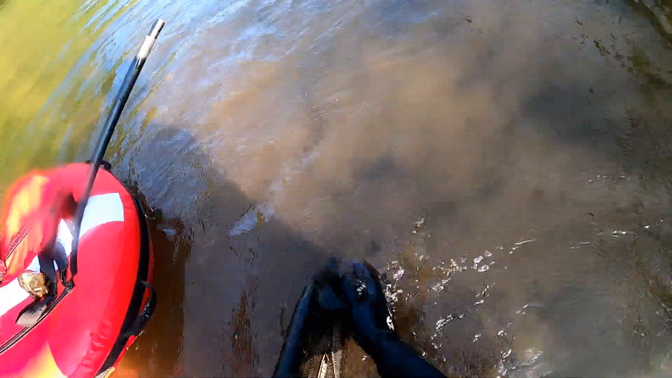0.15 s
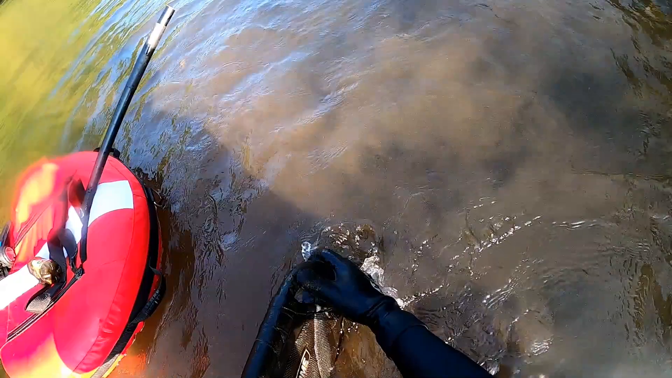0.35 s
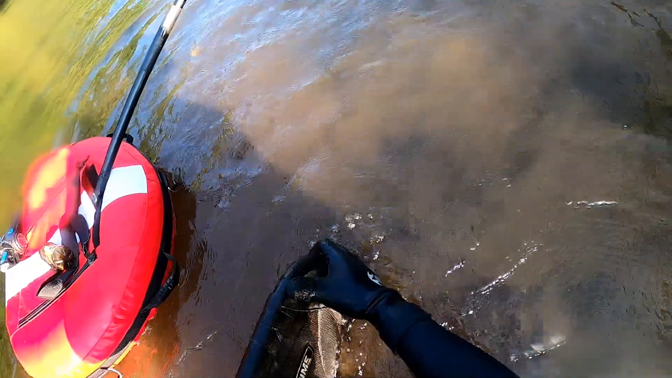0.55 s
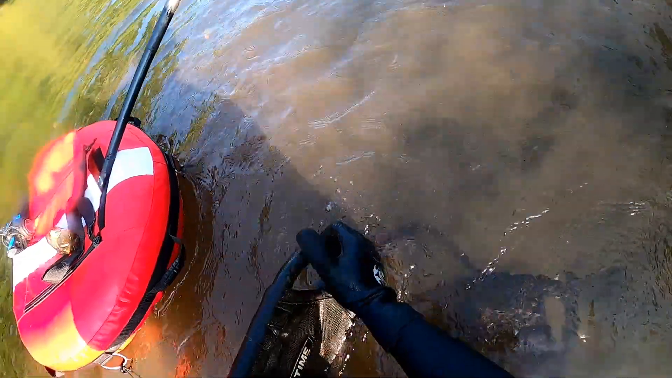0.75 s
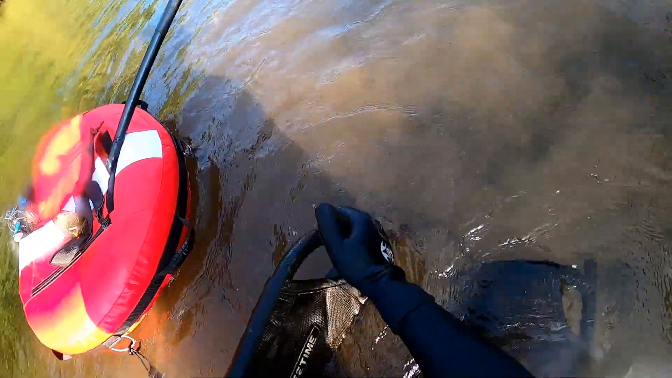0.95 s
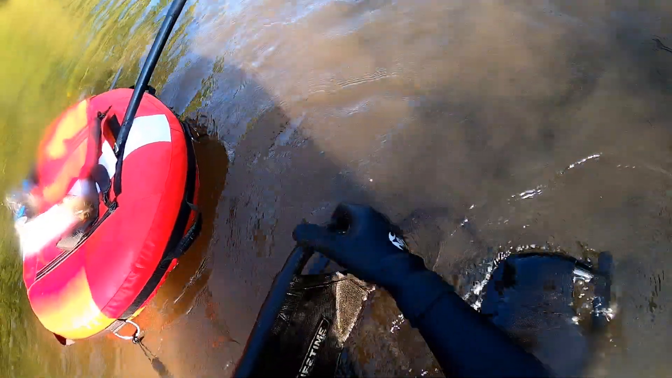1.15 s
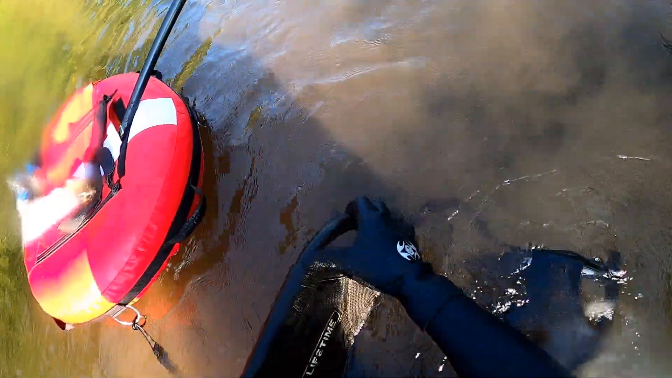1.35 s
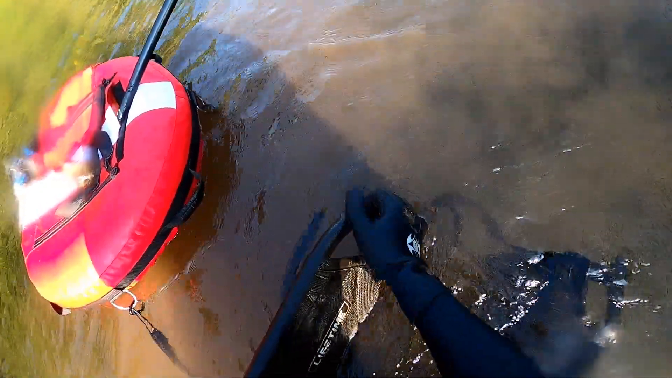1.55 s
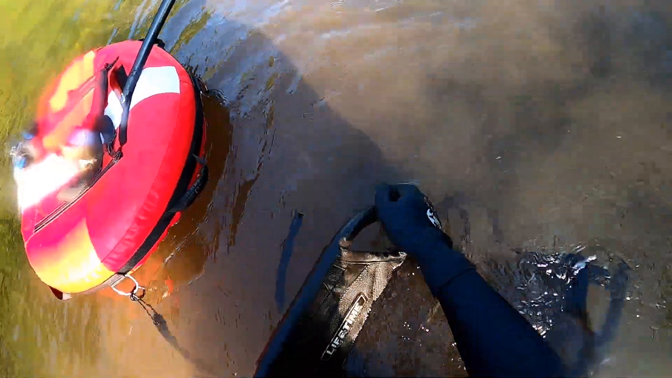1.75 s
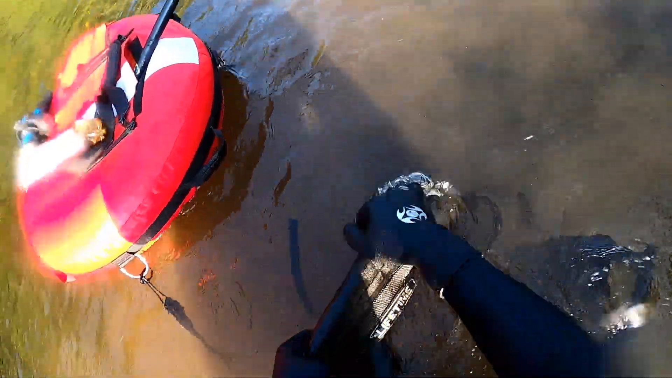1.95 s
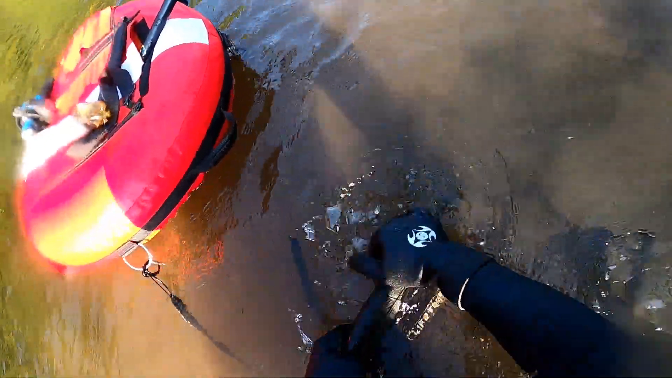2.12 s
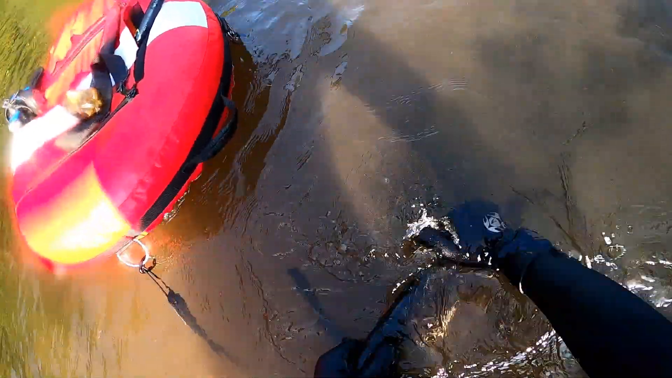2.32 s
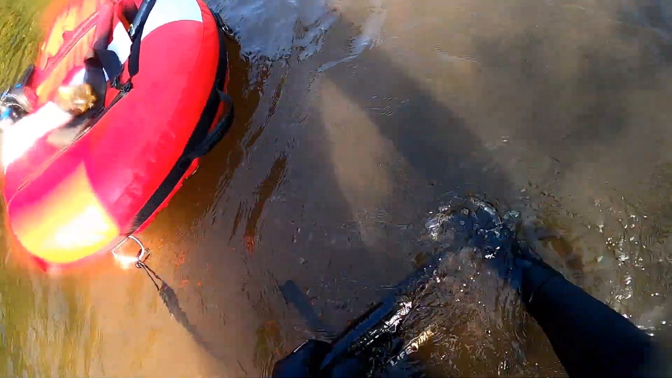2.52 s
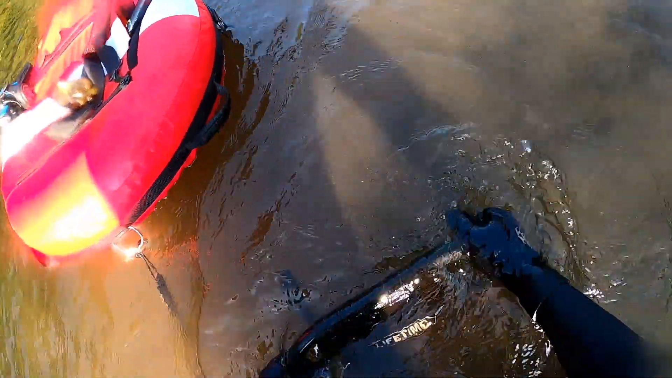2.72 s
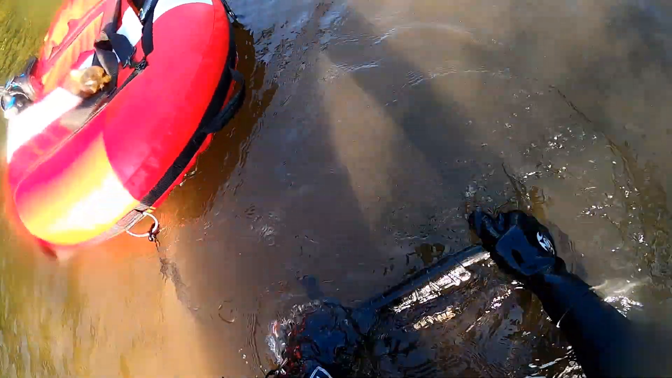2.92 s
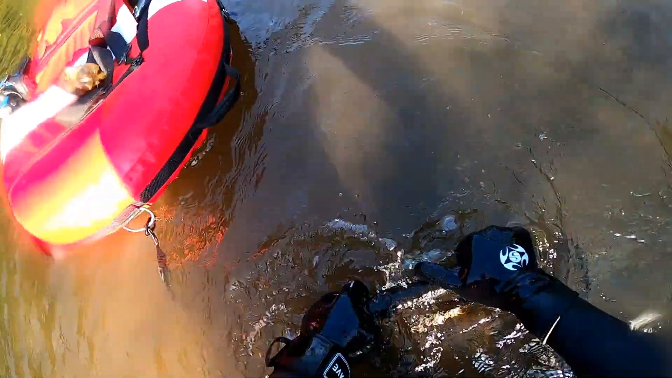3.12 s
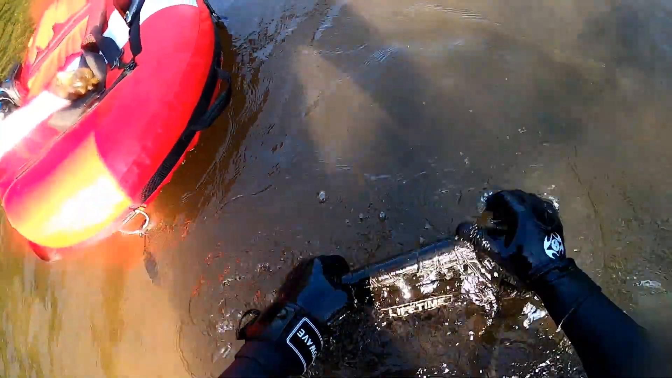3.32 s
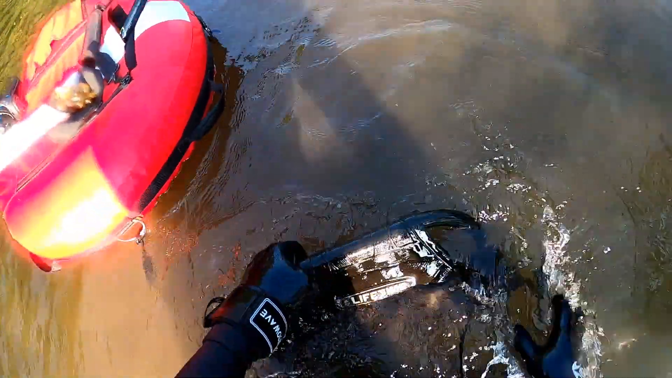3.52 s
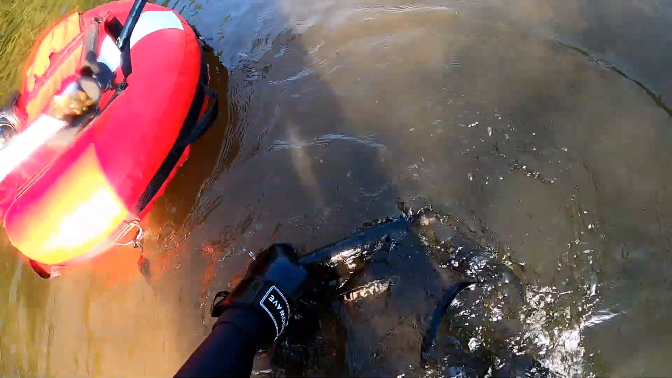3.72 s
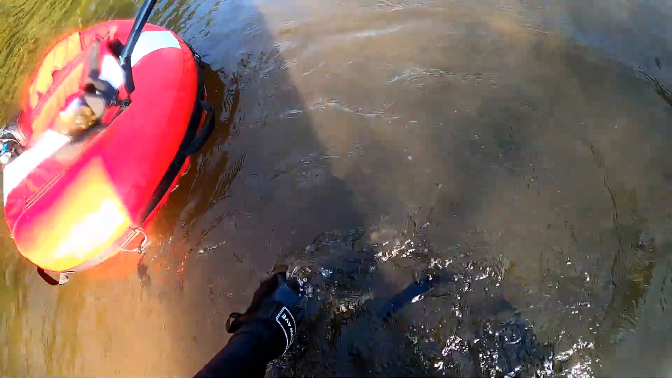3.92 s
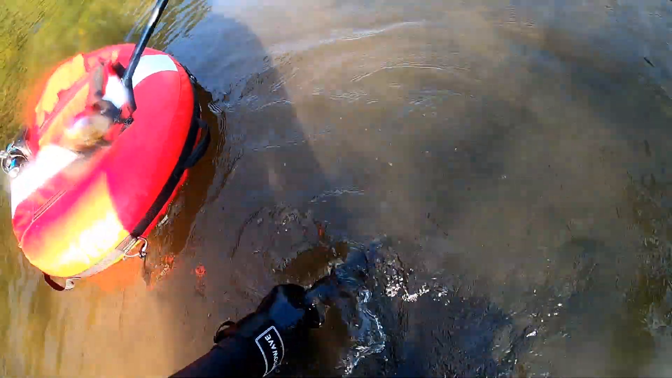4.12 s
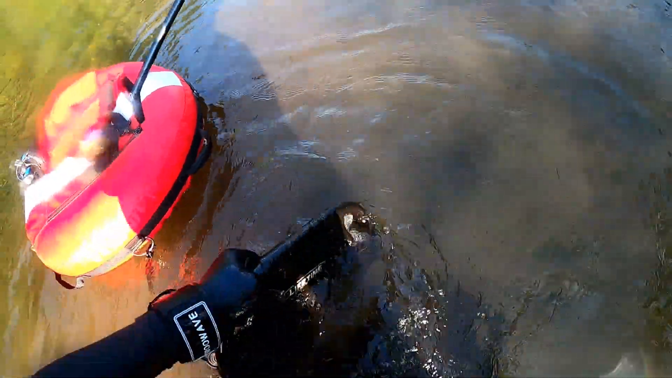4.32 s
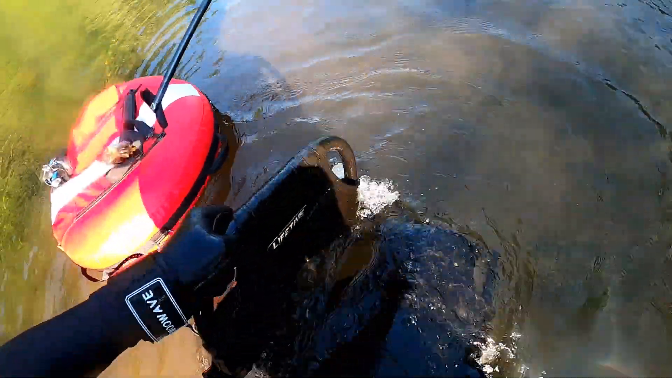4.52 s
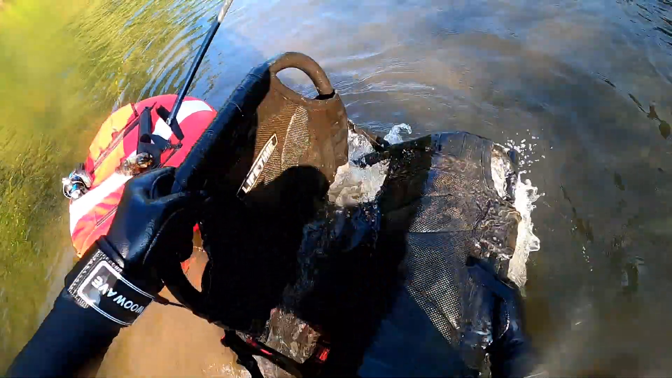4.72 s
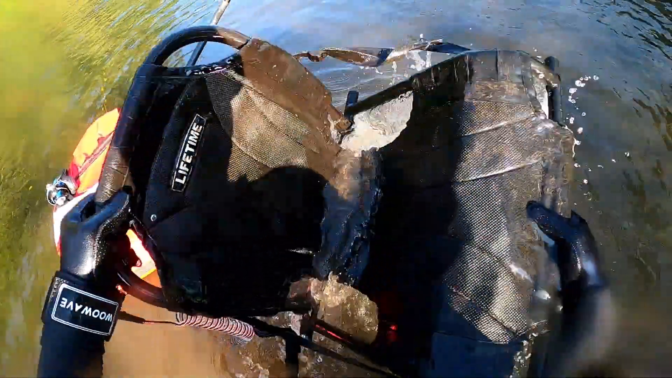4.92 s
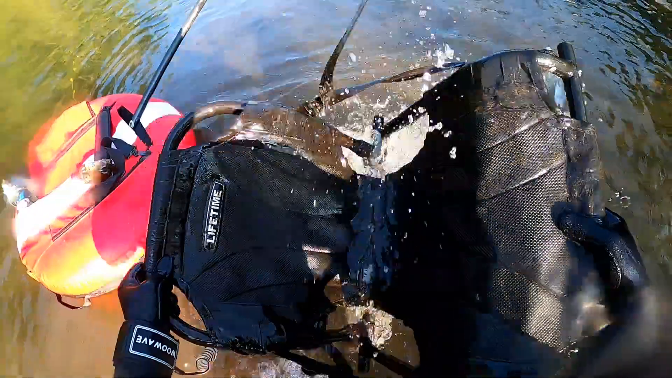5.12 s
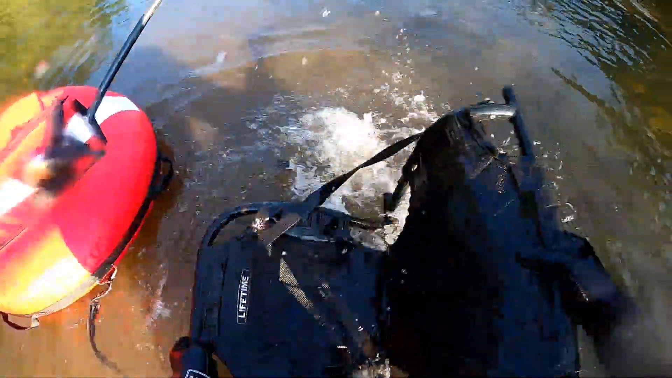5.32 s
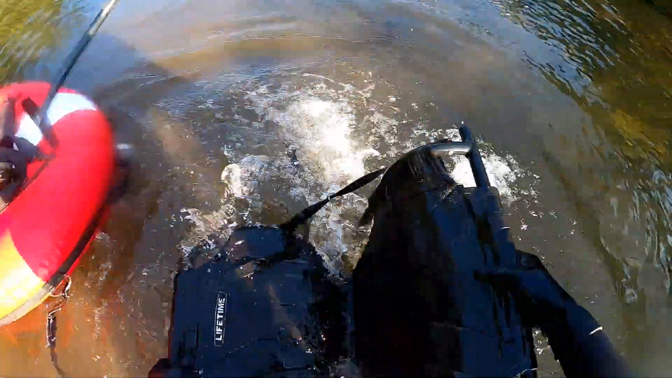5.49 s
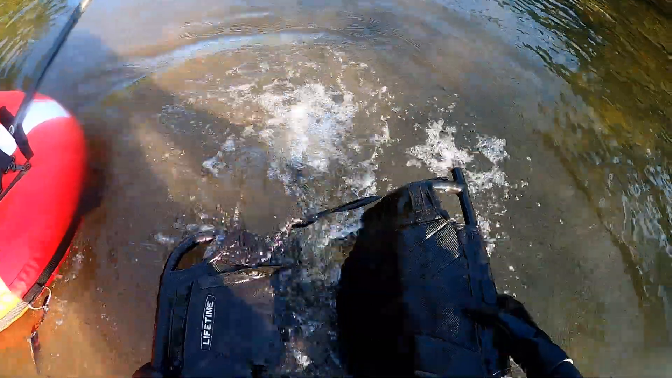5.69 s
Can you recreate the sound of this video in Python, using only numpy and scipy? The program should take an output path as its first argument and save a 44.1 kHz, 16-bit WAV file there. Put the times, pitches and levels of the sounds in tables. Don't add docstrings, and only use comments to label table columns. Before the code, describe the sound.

Quiet, almost mono river murmur with small gurgles comes first, then a lull. Handling resumes with knocking air pockets, crisp drops and short rushes of spray that thicken in the middle. The last stretch is loudest: deep, hollow glugging and heavy churning as the soaked object lifts clear, shedding water. Wind buffets the close, enclosed microphones, and the stereo image gradually widens.

```python
import sys
import numpy as np
from scipy import signal
from scipy.fft import rfft, irfft, next_fast_len
from scipy.io import wavfile

SR = 44100
rng = np.random.default_rng(int(sys.argv[2]) if len(sys.argv) > 2 else 0)


def how_loud(loudness_db):
    steps = np.asarray(loudness_db, float) / 20
    return 10 ** steps


def generate_wav(signal):
    frames = np.transpose(np.atleast_2d(signal))
    scaled = np.clip(frames, -1, 1) * 32767
    pcm = np.round(scaled).astype(np.int16)
    wavfile.write(sys.argv[1], SR, pcm)


N = 253557

# (time [s], peak
# [dB], pitch [Hz])
GLUGS = [(0.119, -34.5, 686), (0.594, -37, 497), (2.07, -26, 546), (2.132, -31.5, 607),
         (2.164, -34, 530), (2.35, -41, 535), (2.756, -35.5, 570), (3.141, -29, 635),
         (3.724, -28, 385), (3.934, -26.5, 625), (3.975, -25.5, 564), (4.052, -31.5, 362),
         (4.163, -31, 290), (4.196, -29, 474), (4.312, -25, 328), (4.388, -29, 400),
         (4.453, -30, 361),
         (4.525, -22.5, 464), (4.568, -23.5, 440), (4.602, -21, 566), (4.633, -23.5, 635),
                 (4.683, -25, 518), (4.712, -15.5, 547), (4.967, -39, 556), (5.002, -19.5, 503),
                 (5.065, -19.5, 540), (5.156, -24.5, 574), (5.228, -23.5, 225), (5.227, -20, 336),
                 (5.259, -14.5, 571), (5.312, -22.5, 402), (5.354, -24, 535), (5.636, -29.5, 550),
                 (5.686, -31, 613), (5.726, -22, 316),
         (2.09, -32, 414), (4.489, -25, 700), (5.445, -22, 195), (2.513, -24.5, 498),
                   (2.776, -37, 332), (4.214, -31.5, 654), (4.81, -25, 320), (4.829, -27, 673),
                   (4.869, -32, 615), (4.929, -25, 544), (5.077, -18.5, 240), (5.244, -20, 592),
                   (5.284, -22, 568), (5.441, -18, 596), (4.7, -20, 553), (5.459, -24, 614),
                   (5.484, -24, 360), (5.562, -24.5, 625)]
# (time [s], peak [dB], pitch [Hz], swell [s])
SNAPPING_POCKETS = [(.157, -30.5, 523, 0.003), (.1645, -22.5, 402, 0.0039), (2.758, -27.5, 590, 0.0023),
                    (.119, -31.5, 673, 0.0017), (3.369, -33.5, 510, 0.0028), (2.497, -16.5, 450, 0.0033),
                    (3.8, -30, 400, 0.0015), (3.978, -25, 400, 0.0018), (4.015, -27, 405, 0.0016),
                    (4.499, -14, 558, 0.0043), (5.038, -14.5, 497, .0025), (5.099, -22, 512, 0.0024),
                    (5.416, -16, 518, 0.0021), (5.4305, -13.5, 535, 0.0031), (5.546, -27, 543, .003)]
# (time [s], peak [dB], pitch [Hz], swell [s])
BUBBLES = [(0.1605, -31.5, 1280, 0.0023), (2.07, -29, 900, 0.0005), (2.194, -41, 2240, 0.0028),
           (2.484, -44, 1060, 0.0029), (2.855, -49, 1510, 0.0028), (3.0853, -36, 1770, 0.0032),
           (3.0987, -37, 1460, 0.0038), (3.538, -35, 1760, 0.0025), (3.5676, -41, 1430, 0.0045),
           (3.6303, -37, 1950, 0.0033), (3.7479, -34, 1830, 0.0024), (3.8935, -37, 855, 0.0034),
           (3.914, -26.5, 1510, 0.0015), (4.0128, -36, 1940, 0.005), (4.0266, -29.5, 2270, 0.0018),
           (4.051, -30, 1910, 0.0012), (4.3234, -32, 2270, 0.0033), (4.482, -33, 1110, 0.0012),
           (4.6584, -28, 1500, 0.0014), (4.7206, -33, 1850, 0.00396), (4.987, -26.5, 1410, 0.0021),
           (5.3409, -36, 1820, 0.0032), (5.3507, -31, 990, 0.0015), (5.5784, -35, 1480, 0.0028),
           (5.6257, -39, 950, 0.0016),
           (.089, -55, 1290, .0042), (.189, -56, 1440, .0024), (.3326, -49.5, 1270, .0048),
                 (3.64, -38, 1400, .003), (3.673, -36, 1350, .003), (3.687, -37, 1700, .002),
                 (3.574, -36, 2500, .002), (1.4227, -58, 2010, .003), (3.01, -46, 1750, .003),
                 (3.2261, -43, 1940, .0026), (3.585, -39, 1800, .003), (3.6, -38, 1300, .004),
                 (4.395, -37, 1150, .003), (4.4263, -39, 1580, .0039), (4.535, -37, 1900, .003),
                 (4.775, -35, 1500, .004), (4.862, -34, 1300, .004), (4.885, -36, 1600, .005),
                 (5.285, -33, 1350, .003)]
# (time [s], level [dB], pitch [Hz], climb [octaves per s], length [s])
CLIMBING_BUBBLES = [(3.147, -30.5, 660, 41, .038), (3.1, -42, 1100, 30, .02), (2.385, -33, 255, 1, .07),
                    (3.62, -31, 540, 8, .032), (3.764, -26, 530, 3, .034), (.153, -42, 1000, 36, .014),
                    (3.568, -27, 560, -8, .046), (3.608, -33, 2100, -4, .018), (3.878, -22, 570, 2, .05),
                    (2.962, -43, 1000, 11, .042), (3.19, -43, 1080, 12, .034), (.555, -57, 1420, -2, .05),
                    (.464, -51, 1650, 12, .012), (.409, -51, 1850, 18, .016), (2.919, -38, 1450, 9, .032),
                    (3.653, -30, 1120, 30, .024), (2.068, -37, 800, 60, .012), (.118, -40, 900, 300, .006),
                    (3.652, -23, 450, 10, .044), (1.63, -58, 2200, -6, .014)]
# (time [s], level [dB])
HAUL = [(0.0, -42.5), (0.51, -46.5), (1.87, -42.5), (2.3, -39), (2.83, -40), (3.41, -41), (3.75, -36),
        (3.88, -32.5), (4.24, -38), (4.45, -34), (4.69, -26), (4.9, -25.5), (5.01, -26.5), (5.4, -27.5),
        (5.54, -32.5), (5.75, -36.5)]
# (time [s], change [dB], half length [s])
HEAVES = [
    (2.37, 5.5, 0.053),
    (2.9, -5.5, 0.039),
    (3.1, 5, 0.069),
    (5.41, -1.5, 0.013),
    (4.13, -21, 0.024),
    (4.95, -2, 0.015),
    (5.19, 0, 0.0065),
    (5.27, 4.5, 0.014),
    (5.46, 8, 0.11),
]
# (time [s], level [dB])
DRAIN = [(1.8, -83), (1.92, -59.5), (2.1, -47), (2.17, -52), (2.65, -52.5), (3.05, -52), (3.23, -51),
         (3.48, -48.5), (3.62, -45.5), (3.8, -46.5), (3.91, -38.5), (4.05, -52), (4.33, -45), (4.49, -45.5),
         (4.87, -40), (5.42, -38), (5.6, -44.5), (5.75, -50.5)]
# (time [s], rise [dB], half length [s])
SURGES = [(2.085, -1, 0.022), (2.145, -2, 0.013), (2.44, 4, 0.011), (2.745, 5, 0.019), (2.81, 5.5, 0.0081),
          (2.885, 4, 0.024), (2.95, 3.5, 0.024), (3.105, 9, 0.021), (3.16, 10, 0.0087), (3.3, 2, 0.0069),
          (3.49, 7, 0.0098), (3.575, 4.5, 0.024), (3.66, 9, 0.014), (3.745, 3.5, 0.013),
          (3.91, -1.5, 0.033), (4.03, 9, 0.015), (4.085, 6, 0.038), (4.215, 11.5, 0.0032),
          (4.335, 3, 0.0091), (4.4, 6, 0.017), (4.7, 2.5, 0.054), (4.845, 3.5, 0.018), (4.97, 0, 0.027),
          (5.1, 3.5, 0.021), (5.355, 6, 0.02), (5.475, 5, 0.033)]
# (time [s], change [dB], half length [s])
LULLS = [(.75, 3, 0.092), (2.594, -3.5, 0.099), (3.015, -0.5, 0.03), (3.348, -6, 0.075), (4.16, -2, 0.055),
         (4.467, -5.5, 0.03), (5.202, -2, 0.12), (1.25, -17, 0.25)]
# (time [s], peak [dB], ring pitch [Hz], snap against the ring [dB])
DROPS = [(2.1922, -35.5, 3490, 12), (2.4455, -30, 3900, 8), (2.4964, -26.5, 3870, 4.5),
         (2.6496, -46, 4160, 11), (2.737, -24, 6200, 1), (2.7813, -36, 4040, 14), (2.8953, -27.5, 3720, 7),
         (2.966, -38, 4140, 11), (3.0622, -21.5, 3210, -28), (3.0888, -31, 6460, 1), (3.154, -22, 6680, 2),
         (3.202, -23, 3920, 0.5), (3.258, -19.5, 3680, -23), (3.304, -29.5, 6200, 6),
         (3.4805, -15, 3890, -21), (3.583, -11.5, 3750, -15), (3.6526, -11, 3700, -12),
         (3.754, -20, 3900, -6), (3.7819, -23, 3970, 1.5), (3.874, -28.5, 4030, 11.5),
         (4.0503, -21, 3000, -2), (4.2235, -27, 2490, -6), (4.334, -19.5, 3940, -4), (4.342, -17, 3800, -6),
         (4.3662, -18.5, 3720, 0), (4.382, -23, 5340, -9), (4.468, -17, 5920, -17),
         (4.561, -18.5, 3470, -24), (4.7188, -15.5, 3380, -7), (4.833, -18, 2820, 0),
         (4.8474, -17.5, 4130, 1), (5.293, -26, 5180, -3), (5.415, -24, 5260, 0), (5.561, -21.5, 4020, -2),
         (.119, -64, 2400, 2), (.1645, -68, 3020, 6), (2.042, -28.5, 3500, -15), (2.0547, -34, 6000, -2),
           (2.0726, -37, 3970, 8), (2.0813, -35, 3380, 8), (2.1035, -42, 3640, 12), (2.143, -31, 2720, 4),
           (2.225, -30, 6320, -9.5), (2.2574, -53, 3510, -3), (2.2712, -52, 4080, -8),
           (2.4227, -36.5, 3300, -1), (2.4853, -33, 4010, 0), (2.5144, -37, 3520, 6.5),
           (2.5712, -33.5, 3400, 0), (2.708, -40, 3800, 11), (2.798, -33, 6230, -1), (2.856, -30, 3580, 5),
           (2.8744, -36, 3830, 3.5), (2.9344, -37, 3580, 0), (2.9416, -30, 6240, -5),
           (3.099, -27, 2020, -7), (3.104, -31.5, 4140, 11.5), (3.1414, -32, 4100, 8),
           (3.164, -35, 4330, -1), (3.1867, -35, 4130, 4), (3.239, -32, 4040, -5), (3.288, -35, 6350, -6),
           (3.4179, -37, 3900, 6), (3.4388, -37, 3780, 16), (3.462, -33, 3800, 2), (3.4926, -19, 4100, -10),
           (3.508, -23, 3600, -6), (3.534, -24, 6240, -9), (3.5723, -20, 4020, 1), (3.6127, -30, 2090, -6),
           (3.6625, -34, 4120, -5), (3.6887, -27, 4240, 4), (3.735, -23, 4200, -8), (3.803, -21.5, 3210, 2),
           (3.8315, -29.5, 4420, 11.5), (3.973, -24, 4170, 4), (4.013, -27, 3600, 3),
           (4.0793, -24, 6150, 0), (4.1257, -27, 5900, -1), (4.25, -27, 2140, 1), (4.295, -21.5, 2540, 0),
           (4.3212, -33, 4100, 13), (4.5214, -36, 4050, 0), (4.5904, -29.5, 3980, 11.5),
           (4.6304, -24, 3830, 3), (4.685, -18, 3470, -11), (4.8883, -21, 3870, -4)]
# (time [s], peak [dB])
TICKS = [(2.054, -57), (2.149, -47.5), (2.192, -45), (2.258, -53), (2.422, -57), (2.485, -50), (2.707, -54),
         (2.792, -50), (2.855, -58), (3.155, -45), (3.185, -48), (3.583, -43), (3.982, -42.5), (4.079, -47),
         (4.296, -55), (4.313, -50), (4.568, -49), (4.632, -46), (4.753, -49), (4.837, -53), (5.224, -49),
         (5.62, -47), (5.631, -47), (2.071, -48), (2.228, -43.5), (2.625, -55), (2.65, -46), (2.8943, -41),
         (3.0895, -49), (3.142, -49), (3.2882, -53), (3.3086, -44.5), (3.414, -54), (3.437, -44.5),
         (3.51, -38.5), (3.624, -42), (3.753, -38), (3.783, -35), (3.827, -47), (3.868, -41), (4.126, -51),
         (4.192, -46.5), (4.467, -37.5), (4.521, -46), (4.589, -51), (4.956, -37.5), (5.055, -55),
         (5.3188, -51), (5.5, -39.5)]
# (time [s], peak [dB], first half swing [s], side [left 1, right -1])
GUSTS = [
    (5.546, -9.5, .009, -1),
    (5.385, -19, .003, 1),
    (3.36, -33, .005, -1),
    (3.68, -27, .009, 1),
]
# (time [s], level [dB])
BREEZE = [(0, -36), (.3, -55.5), (.6, -46), (1.2, -49), (1.8, -53), (2.1, -43.5), (2.45, -51.5),
          (2.9, -40.5), (3.25, -46.5), (3.55, -45), (3.72, -33), (4.0, -44.5), (4.55, -48), (4.9, -42),
          (5.2, -39), (5.5, -41), (5.75, -54)]
# (time
# [s], level [dB])
UPPER_BAND = [(1.9, 1.5), (2.15, -34), (3.6, -0.5)]
# (time [s], stereo share [0-1])
WIDTH = [(0, 0), (1.3, 0.02), (1.45, 0.17), (1.8, 0.36), (2.1, 0.22), (2.4, 0.21), (3.25, 0.49),
         (4.45, 0.92), (5.75, 1.02)]
# (frequency [Hz], level [dB])
GURGLE = [(76, -50.5), (130, -19.5), (210, -16.5), (338, -6), (382, -3), (456, -5.5), (567, 1), (804, -13),
          (900, -14.5), (1170, -49), (1980, -135)]
# (frequency [Hz], level [dB])
SLOSH = [(500, -29), (850, -9.5), (1020, -4), (1220, -7), (1390, -2), (2200, -14), (2860, -40.5),
         (4840, -135)]
# (frequency [Hz], level [dB])
SPRAY = [(1200, -20), (1900, -8), (2800, -5.5), (3300, -4.5), (4100, 1.5), (4350, -2.5), (4800, -16.5),
         (5500, -8.5), (6250, -3), (7000, -11.5), (8000, -21), (10000, -34), (13000, -44.5), (15500, -81.5)]
# (frequency [Hz], level [dB])
RIVER = [(76, -38), (130, -25), (157, -5.5), (246, -5), (348, -3.5), (421, -9.5), (459, -5.5), (682, -14.5),
         (1150, -33), (2020, -45.5), (6110, -58), (8060, -79), (10500, -112), (17700, -135)]
# (frequency [Hz], level [dB])
WIND = [(10, -20.5), (22, -0.5), (34, 9), (48, -8.5), (65, -5), (100, -13.5), (140, -9), (250, -65),
        (6000, -70), (7500, -120)]
# (frequency [Hz], level [dB], phase [radians])
PORTS = [(200, -20.2, 2.8), (300, -17.2, 1.34), (380, -10.5, 1.11), (440, -3.2, 0.59), (490, 1.3, -0.69),
         (550, -1.0, -1.53), (650, -3.1, -1.64), (800, -4.2, -2.0), (950, -3.3, -2.27), (1100, -4.2, -2.92),
         (1300, -9.6, -3.55), (1600, -16.8, -3.84), (2000, -22.6, -3.86), (3000, -47.5, -3.96)]


def in_time(rows):
    s, *columns = np.transpose(rows)
    return [np.interp(np.arange(N) / SR, s, column) for column in columns]


def swells(rows):
    t = np.arange(N) / SR
    return sum(change_db * np.exp(-((t - s) / half_s) ** 2) for s, change_db, half_s in rows)


def rms_one(x):
    return x / np.sqrt(np.mean(x ** 2) + 1e-20)


def drift(rate_hz):
    r = np.exp(-80 * np.pi * rate_hz / SR)
    slow = signal.lfilter([1], [1, -2 * r, r * r], rng.standard_normal(N // 40 + 2002))[2000:]
    return np.interp(np.arange(N) / 40, np.arange(len(slow)), rms_one(slow))


def low_pass(x, order, hz):
    return signal.sosfiltfilt(signal.butter(order, hz, fs=SR, output="sos"), x)


def high_pass(x, order, hz):
    return signal.sosfilt(signal.butter(order, hz, "high", fs=SR, output="sos"), x)


def on_grid(points, size, order=1):
    hz = np.maximum(np.fft.rfftfreq(size, 1 / SR), 1)
    return np.interp(np.log(hz), np.log(np.array(points)[:, 0]), np.array(points)[:, order])


def colour(x, spectrum):
    size = 16384
    cepstrum = irfft(np.log(how_loud(on_grid(spectrum, size))), size)
    cepstrum[1:size // 2] *= 2
    response = irfft(np.exp(rfft(cepstrum[:size // 2], size)), size)
    fade = np.hanning(size)[size // 2:]
    return signal.fftconvolve(x, response[:size // 2] * fade)[:N]


def coloured_noise(spectrum):
    return rms_one(colour(rng.standard_normal(N), spectrum))


def ring(clicks, hz, cycles):
    r, w = how_loud(-60 * hz / (cycles * SR)), 2 * np.pi * hz / SR
    return signal.lfilter([0, np.sin(w)], [1, -2 * r * np.cos(w), r * r], clicks + 1e-18)


def froth(spectrum, low_hz, high_hz, per_s, spread_db, cycles, clump_db, smooth, count, hiss_hz=16000):
    sizes = how_loud(spread_db * np.minimum(rng.exponential(1, N), 2.8)) * rng.choice([-1, 1], N)
    born = rng.random(N) < per_s * how_loud(clump_db * drift(20.)) / SR
    dealt = rng.integers(0, count, N)
    grains = np.zeros(N)
    for k, hz in enumerate(np.geomspace(low_hz, high_hz, count)):
        clicks = sizes * born * (dealt == k)
        grains += hz ** 1.31 * ring(ring(clicks, hz, cycles), hz, cycles)
    hiss = signal.sosfilt(signal.butter(3, hiss_hz, fs=SR, output="sos"), rng.standard_normal(N))
    return rms_one(rms_one(colour(grains, spectrum)) + smooth * rms_one(colour(hiss, spectrum)))


def bubbles(rows, rise, sharpness, slap_db, slap_hz):
    out, slaps, t = np.zeros(N + SR), np.zeros(N + SR), np.arange(4000) / SR
    splat = rng.standard_normal((len(rows), len(t)))
    for (s, peak_db, hz, swell_s), noise in zip(rows, splat):
        cycles = np.cumsum(hz * 2 ** (rise * (t - swell_s))) / SR
        age = t / max(swell_s, .001)
        shape = how_loud(peak_db) * (age * np.exp(1 - age)) ** sharpness
        at = round((s - 0.542 * swell_s) * SR)
        out[at:at + len(t)] += shape * np.sin(2 * np.pi * cycles)
        slaps[at:at + len(t)] += shape * noise
    band = signal.butter(4, [0.3 * slap_hz, slap_hz], "band", fs=SR, output="sos")
    return out[:N] + how_loud(slap_db) * signal.sosfilt(band, slaps[:N])


def air_pockets():
    glug_swell_s = 0.00631
    glugs = [(*row, glug_swell_s) for row in GLUGS]
    out = bubbles(glugs, 0.94, 2.0, 3.0, 830.0)
    out += bubbles(BUBBLES, 2.6, 3.2, -10.5, 2420.0)
    return out + bubbles(SNAPPING_POCKETS, 1.7, 1.7, -6.0, 1120.0)


def climbing_bubbles():
    out, fade_db = np.zeros(N + SR), 6
    for s, level_db, hz, rise, length in CLIMBING_BUBBLES:
        age = np.arange(int(length * SR)) / SR
        edges = np.minimum(1, age / 0.0048) * np.minimum(1, (length - age) / 0.015)
        wobble_db = 2.2 * np.interp(age * 200, np.arange(16), rng.standard_normal(16))
        level = how_loud(level_db + wobble_db - fade_db * age / length) * edges
        cycles = np.cumsum(hz * 2 ** (rise * age)) / SR
        out[round(s * SR):][:len(age)] += level * np.sin(2 * np.pi * cycles)
    return out[:N]


def churned_water(haul_db, upper_db):
    gurgle = froth(GURGLE, 153.4, 843, 600, 6.6, 13.2, 2.5, 0.74, count=14, hiss_hz=1210)
    deep = low_pass(gurgle, 3, 660)
    brightness_db = 0.081 * (haul_db + 24.0) + 0.76 * upper_db
    level_db = haul_db - 2.5 + 0.18 * swells(LULLS) + swells(HEAVES)
    return how_loud(level_db) * (deep + how_loud(brightness_db) * (gurgle - deep))


def slosh(spray_db, haul_db):
    floor_db = -63. - 5.6 * np.arange(N) / SR + 3.5 * drift(3.6)
    from_drain = 0.82 * (np.maximum(spray_db, floor_db) + 43)
    from_haul = 0.093 * (haul_db + 23.5)
    level_db = 0.67 * swells(LULLS) - 48 + from_drain + from_haul
    return how_loud(level_db) * froth(SLOSH, 1100, 2260, 400, 2.5, 23.0, 1.6, 0.86, count=10, hiss_hz=1840)


def draining_spray(spray_db):
    spray = froth(SPRAY, 1700, 11000, 1800, 3.4, 18., 4., .85, count=16)
    body = low_pass(spray, 2, 7600)
    top_db = 0.3 * (spray_db + 54.5) + 4.5 * drift(24.0)
    return how_loud(spray_db + 2.5) * (body + how_loud(top_db) * (spray - body))


def drops():
    ring_s, snap_s, tick_s = 0.0013, 0.0021, 0.0012
    onset_s = .0006
    out, snaps, ticks = np.zeros((3, N + SR))
    t = np.arange(500) / SR
    rows = DROPS
    crackle = rng.standard_normal((len(rows) + len(TICKS), len(t)))
    ring_shape = np.exp(-((t - .0032) / ring_s) ** 2)
    snap_shape = np.exp(np.minimum((t - .0025) / onset_s, (.0025 - t) / snap_s))
    tick_shape = np.exp(np.minimum((t - .0025) / onset_s, (.0025 - t) / tick_s))
    for (s, peak_db, hz, snap_db), noise in zip(rows, crackle):
        at = round((s - .002) * SR)
        tone = np.sin(2 * np.pi * hz * t * (1 + 8 * t))
        out[at:at + len(t)] += how_loud(peak_db - 10.0) * ring_shape * tone
        snaps[at:at + len(t)] += how_loud(peak_db + snap_db + 2.5) * snap_shape * noise
    for (s, peak_db), noise in zip(TICKS, crackle[::-1]):
        at = round((s - .002) * SR)
        ticks[at:at + len(t)] += how_loud(peak_db + 29.0) * tick_shape * noise
    dull = signal.lfilter([.5], [1, -.5], snaps[:N])
    return out[:N] + colour(dull + high_pass(ticks[:N], 4, 6500), SPRAY)


def plinks(spray_db):
    per_s, level_db = 150, 4
    swell_cycles, rise = 6.5, .17
    out, draws = np.zeros(N + SR), rng.random((900, 4))
    times = 1.9 + np.cumsum(-np.log(1 - draws[:, 0])) / per_s
    for s, (_, pitch, size, slide) in zip(times[times < N / SR - .01], draws):
        hz = 1150. * 2 ** (2.5 * pitch)
        age = np.arange(int(5 * swell_cycles / hz * SR)) / SR * hz / swell_cycles
        cycles = np.cumsum(hz * 2 ** (rise * slide * age)) / SR
        at = round(s * SR)
        level = how_loud(spray_db[at] + level_db - 9.3 * size)
        out[at:at + len(age)] += level * (age * np.exp(1 - age)) ** 2 * np.sin(2 * np.pi * cycles)
    return out[:N]


def port_side(water, spray_db):
    size = next_fast_len(N + 4096)
    cavities = how_loud(on_grid(PORTS, size)) * np.exp(1j * on_grid(PORTS, size, order=2))
    side = irfft(rfft(water, size) * cavities, size)[:N]
    side += how_loud(spray_db - 23.5) * coloured_noise(SPRAY)
    return side + how_loud(-14.) * drift(40.) * high_pass(water, 5, 7800)


def gusts():
    out = np.zeros((2, N + SR))
    for s, peak_db, half_s, side in GUSTS:
        age = np.arange(int(9 * half_s * SR)) / SR / half_s
        swing = np.sin(np.pi * age ** .76) * np.exp(-(age / 5) ** 3) * np.minimum(1, age / .4)
        out[int(side < 0), round(s * SR):][:len(age)] += how_loud(peak_db) * swing
    return out[:, :N]


def wind(level_db):
    lumpy = colour(rng.standard_normal(N), WIND)[::-1] * how_loud(3.4 * drift(8.1))
    return how_loud(level_db) * rms_one(lumpy)


def river(upper_db):
    flow = how_loud(-41.5 - 4.0) * coloured_noise(RIVER)[::-1]
    murmur = low_pass(flow, 3, 600)
    return murmur + how_loud(upper_db) * (flow - murmur)


def scene():
    wind_db, = in_time(BREEZE)
    haul_db, = in_time(HAUL)
    upper_db, = in_time(UPPER_BAND)
    width, = in_time(WIDTH)
    still_db = -112
    spray_db, = in_time([(0, still_db), (1.75, still_db)] + DRAIN)
    spray_db = spray_db + swells(LULLS) + swells(SURGES) - 2.0
    water = air_pockets() + climbing_bubbles()
    water += churned_water(haul_db, upper_db) + slosh(spray_db, haul_db)
    water += draining_spray(spray_db) + drops() + plinks(spray_db)
    water += river(upper_db)
    side = width * port_side(water, spray_db) + width ** 1.2 * wind(wind_db - 4.5)
    return water + wind(wind_db + 0.11) + side * [[1], [-1]] + gusts()


def roll_off(x):
    return signal.sosfilt(signal.butter(12, 15000, fs=SR, output="sos"), x)


def record(dry):
    mix = signal.sosfilt(signal.butter(4, 15500, fs=SR, output="sos"), dry)
    return roll_off(mix)


dry = scene()
out = record(dry)
generate_wav(out)
```